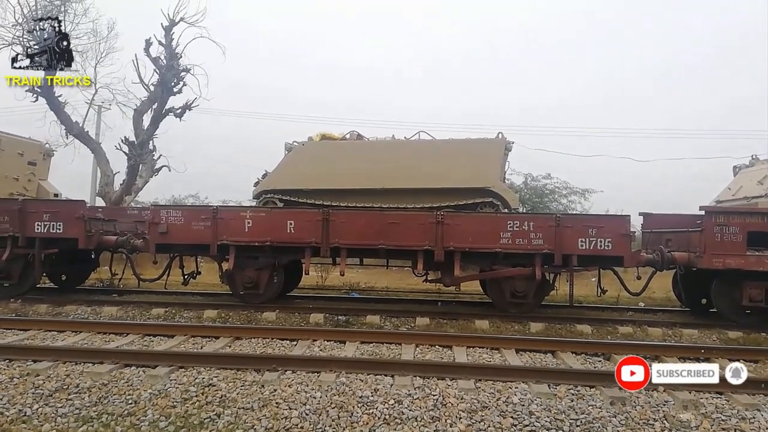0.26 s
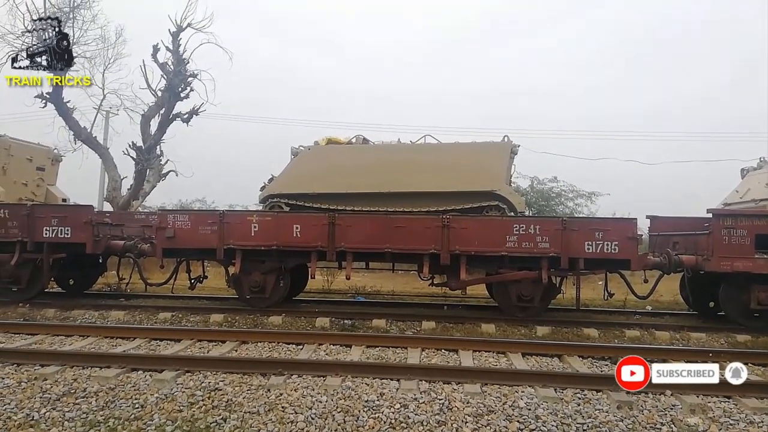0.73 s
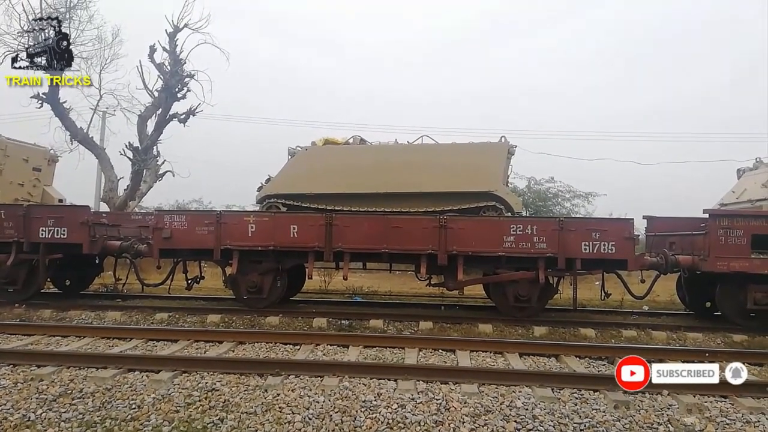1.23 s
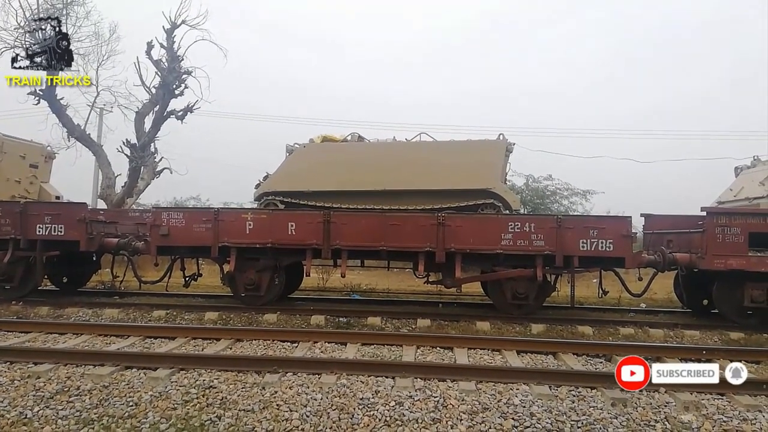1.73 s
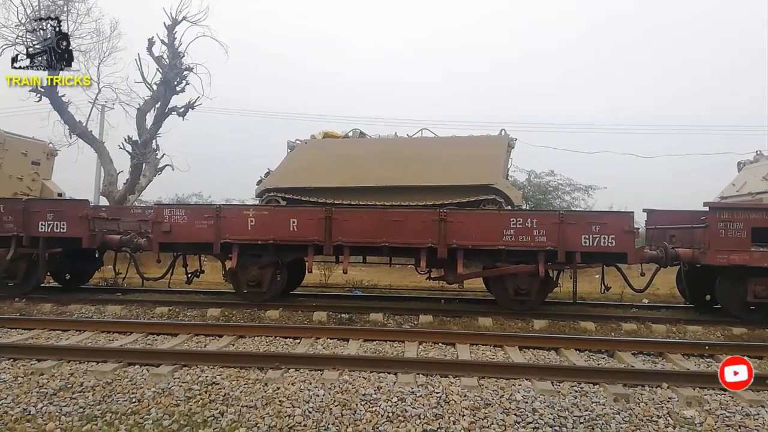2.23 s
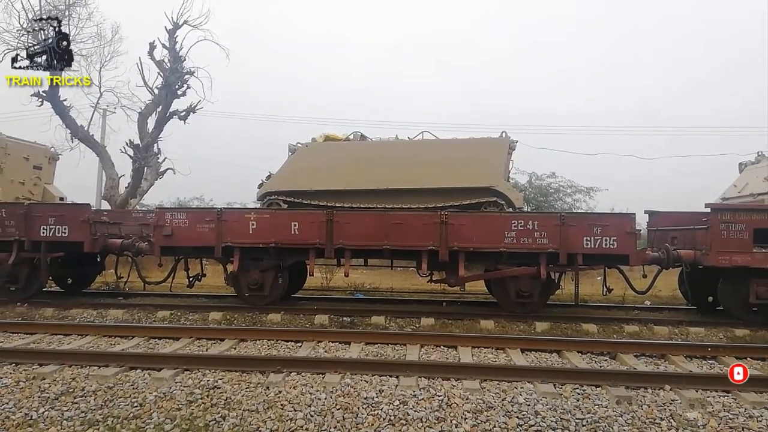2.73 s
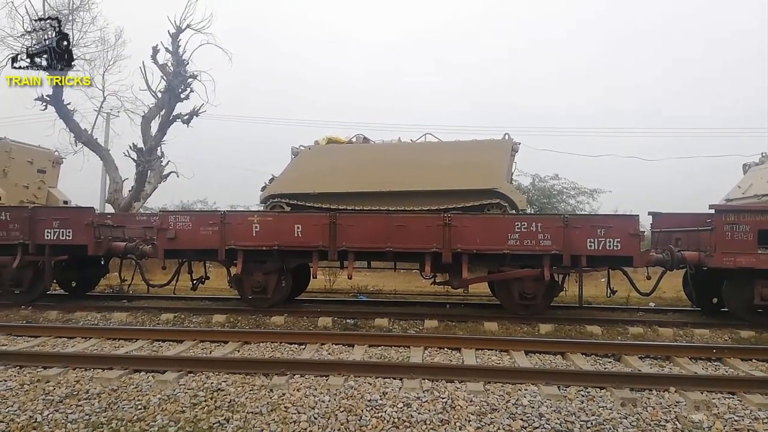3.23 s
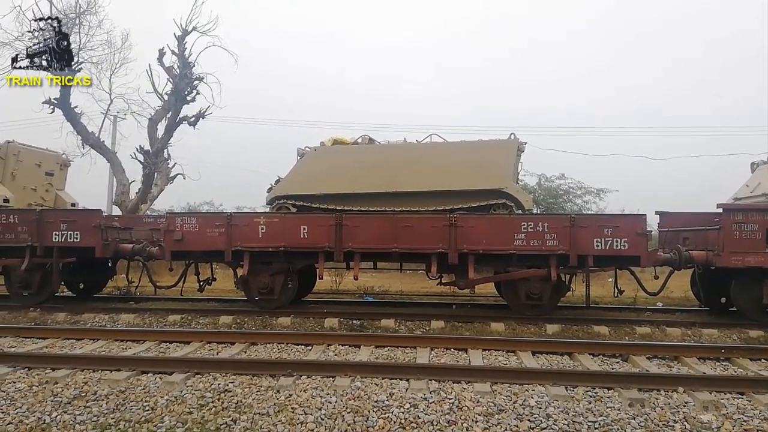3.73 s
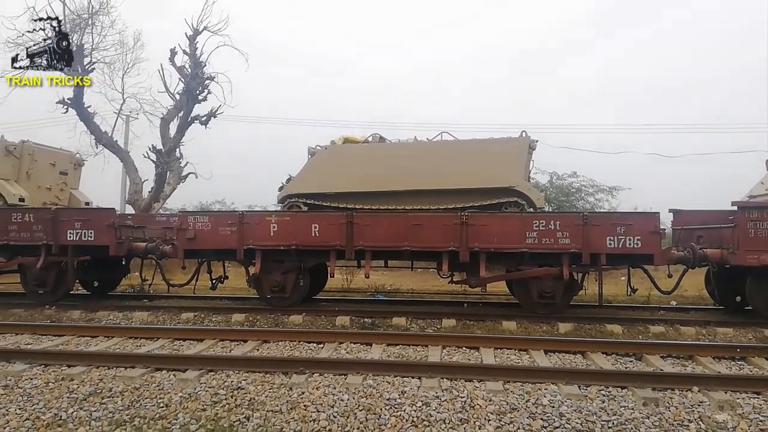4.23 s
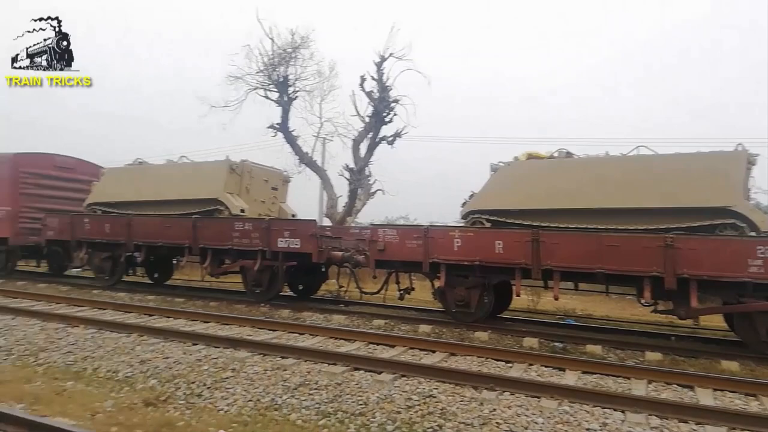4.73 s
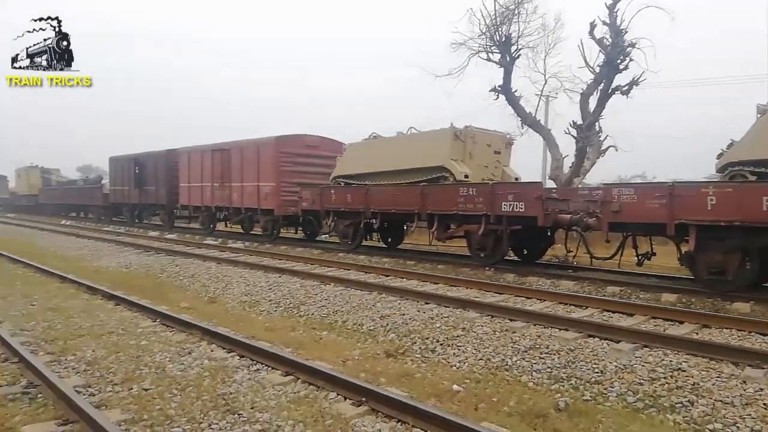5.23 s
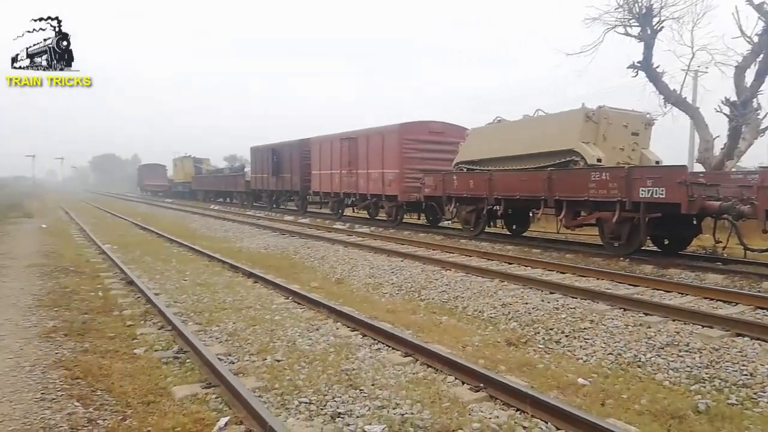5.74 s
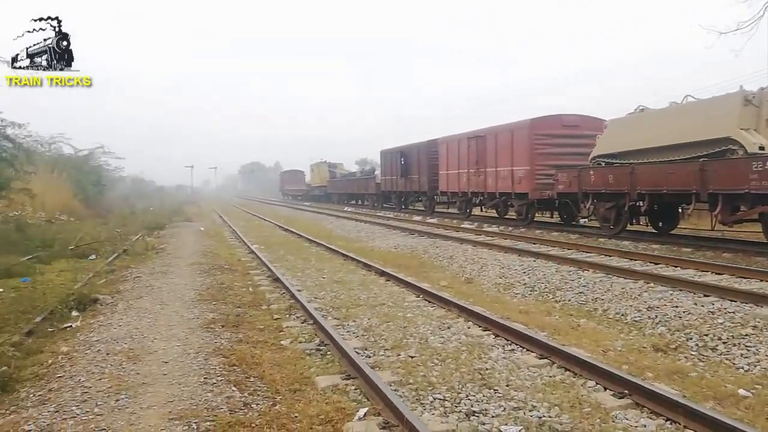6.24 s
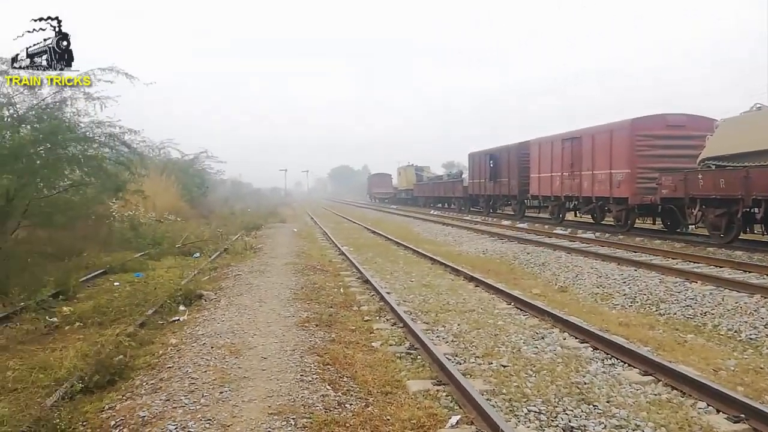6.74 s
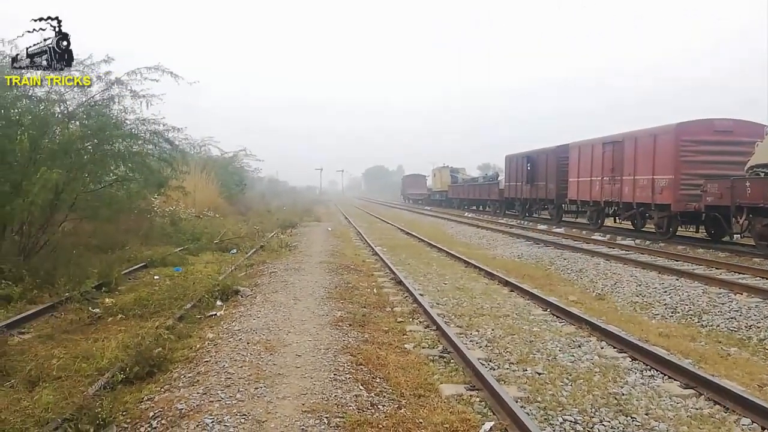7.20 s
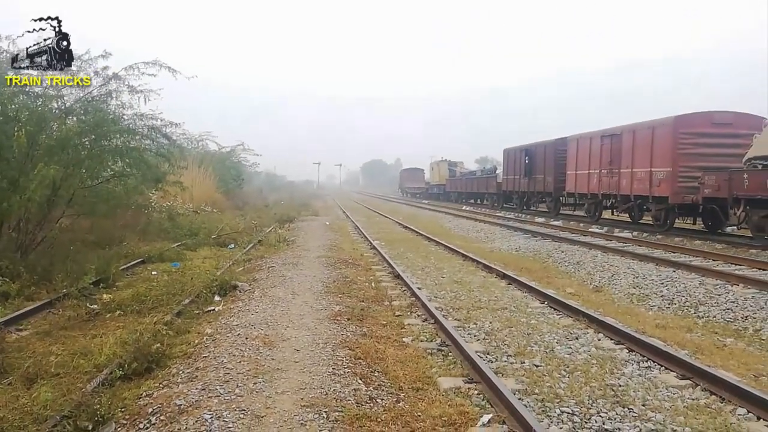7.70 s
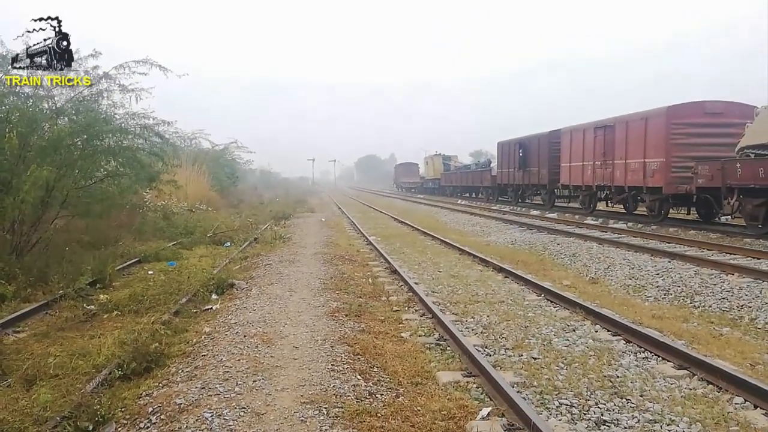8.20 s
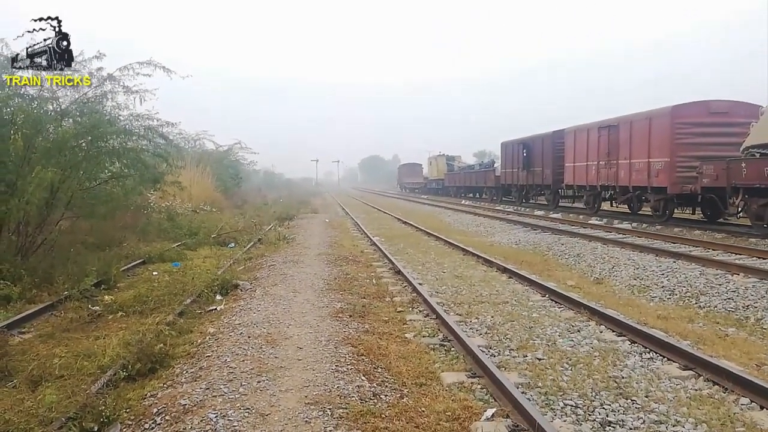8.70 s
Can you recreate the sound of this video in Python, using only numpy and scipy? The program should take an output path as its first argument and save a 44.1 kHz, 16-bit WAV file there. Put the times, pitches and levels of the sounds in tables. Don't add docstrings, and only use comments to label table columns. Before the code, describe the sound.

A large diesel idles throughout in an open rail yard: a low, uneven throb under a broad midrange rush of air, a faint steady whine and quick, soft high ticks. At 0.9 s a thin airy whistle leaks out and grows; at 1.05 s it bursts into a very loud, wide, turbulent hiss with a low pipe boom, peaking near 1.15 s, weakening and shutting at about 1.45 s. A softer echo sinks away over the next half second. The rumble is pushed down by the blast, then quickly returns. A low fan hum slowly rises in pitch until about 6 s. Faint creaks and soft knocks come at 2.1, 2.5 and 3.6 s, with light cloth brushes. From 4.4 s the handheld microphone turns away and the engine grows duller, with rubbing and the strongest knock near 4.9 s, towards the right. Two soft taps follow around 7.3 and 7.5 s; the idle continues to the end at about 9 s.

```python
import sys
import numpy as np
from scipy import signal
from scipy.fft import irfft
from scipy.io import wavfile
from scipy.ndimage import uniform_filter1d

SR = 44100
rng = np.random.default_rng(int(sys.argv[2]) if len(sys.argv) > 2 else 0)


def int16_out(signal):
    q = np.round(np.clip(np.atleast_2d(signal).T, -1, 1) * 32767)
    wavfile.write(sys.argv[1], SR, q.astype(np.int16))


def rack_gain(trim_db):
    fader = np.asarray(trim_db, float)
    return 10 ** (fader / 20)


N = 395136
FRAME, HOP = 1024, 256
HZ = np.fft.rfftfreq(FRAME, 1 / SR)[:, None]
T = (np.arange(N // HOP + 5) * HOP / SR)[None]

CYCLE_HZ, CYCLE_START_S = 1.833, .0417
RUMBLE_DB = -51
EDGE_HZ = 15200

# pitch_hz, density_db
ROAR_FACING = [(160, -40), (280, -15), (326, -13.5), (434, -7.5), (696, -9.5), (757, -4.5), (1230, -14),
               (1540, -13.5), (1980, -18), (2770, -23.5), (4300, -25), (6130, -31.5), (7010, -30),
               (14700, -52), (15800, -56)]
ROAR_HALF_TURNED = [(160, -38), (280, -8), (331, -7), (399, -14.5), (568, -8.5), (1040, -11), (1410, -22.5),
                    (1590, -15.5), (2190, -16), (2730, -28.5), (7010, -32), (14700, -57.5), (15800, -51)]
ROAR_AWAY = [(160, -47), (280, -38), (326, -31), (367, -1.5), (696, -11.5), (757, -2), (824, -10),
             (1540, -12), (2050, -18), (2970, -22.5), (5090, -28.5), (7130, -25), (8020, -32.5),
             (14700, -48), (15800, -57)]
# pitch_hz, density_db
RUMBLE = [(15, -26), (25, -17), (45, -4), (70, -22), (130, -15.5), (200, 9.5), (250, 10.5), (280, -17),
          (400, -42.5), (700, -90)]
# pitch_hz, gain_db
CAVITY = [(2500, 0.), (3000, 2.5), (3600, -0.5), (4300, 2), (5200, -2), (6000, 2.5), (8000, -3),
          (9300, 1.5), (11000, 0.5), (13000, 0), (15000, 8)]
# start_s, pitch_hz, level_db (over the roar), half_length_s
RUSTLES = [
    (3.053, 3500, 7, 0.016),
    (3.78, 1800, 6, .03),
    (3.88, 3460, 4, .03),
    (4.75, 1520, 6, 0.23),
    (5.1, 2260, 1.5, .25),
]
# pitch_hz, level_db (rms)
WHINE = [
    (748.3, -58.5),
    (812.9, -87),
    (931.3, -64.5),
    (1497, -63.5),
    (1556, -73),
]
INJECTORS_DB = [-9, -3.5, -11, -1.5, 1.5, -0.5, 0.5, 0, 2.5, -5, -5, -12]
# multiple, level_db (rms)
HARMONICS = [(11, -53.4), (12, -55.6), (13, -48.8), (16, -59.1), (17, -55.7), (18, -54.1), (19, -46.3),
             (20, -50.8), (21, -53.3), (23, -49.5), (24, -45.4), (25, -54.7), (30, -44.4), (32, -52.7),
             (34, -54.2), (35, -54.8), (39, -57.2), (40, -58.5), (41, -51.3), (42, -55.5), (43, -49.1),
             (45, -53.7), (47, -49.8), (51, -59.8), (52, -55.5), (53, -53.8), (58, -59.1), (60, -54.3),
             (62, -54.7), (64, -57.6),
             (66, -60.5), (68, -54.6), (70, -56.1), (72, -59.9), (76, -62.4), (78, -56.1), (79, -64.2),
         (80, -58.7), (82, -63.7), (84, -59.6), (86, -62.1), (88, -58.3), (96, -60.6), (97, -63.4),
         (104, -59.0), (105, -61.0), (106, -60.6), (107, -63.0), (108, -56.0), (110, -58.9), (112, -60.5),
         (122, -62.8), (124, -60.3), (128, -53.3), (132, -56.4), (150, -64.2)]
# pitch_hz, level_db (rms)
MINOR = [(14, -88), (20, -73), (30, -61), (60, -78), (120, -60), (245, -66), (280, -73.5), (335, -69.5),
         (450, -84.5), (600, -86.5)]
# start_s, pitch_hz, level_db (rms)
FAN = [
    (0, 64.3, -48),
    (2, 64.5, -46.5),
    (3.3, 66.5, -41.5),
    (4.6, 68, -46),
    (6, 69.82, -42),
    (7.4, 69.17, -42.5),
    (8.96, 69.6, -41),
]
# start_s, turn (0 facing, 1 half, 2 away)
TURN = [
    (0, 0.14),
    (4.4, .016),
    (4.9, 0.82),
    (5.5, 1.27),
    (6.2, 1.44),
    (6.8, 1.64),
    (8.96, 1.6),
]
# turn, roar_db, injector_db, whine_db
BEARING = [
    (0, -46.5, -73, 2),
    (1.25, -47.5, -78.5, -1.5),
    (1.65, -48, -68.5, 2),
]
# (pitch_hz, left_right_db)
PORTS_FACING = [
    [(150, 5), (400, 5.5), (600, 1.5), (1300, 1.16), (2300, 0.1), (4000, 0.5), (9000, -0.5)],
    [(0, -3.5), (520, -2.0), (1380, -1), (4310, -7.5), (6120, -4), (13700, -18), (14300, -14), (15500, -16)],
    [(60, 25), (120, -14), (240, 10.5), (480, -10), (950, 0), (1890, 5.5), (3770, -4), (7520, 7), (15000, 2.5)],
]
PORTS_AWAY = [
    [(150, 1), (260, 0.6), (400, 0.36), (700, 0.44), (1600, 0.93), (3500, 0.067), (6500, 0.22), (9000, 0.081)],
    [(0, 11.5), (500, -1.5), (2000, -2.5), (4000, -8.5), (15000, -17)],
    [(60, 0.0), (120, -23), (240, -3), (480, -4), (950, -0.5), (1890, 2.5), (3770, -4), (7520, 2.5), (15000, 2)],
]
PORTS_VALVE = [
    [(300, 0.92), (700, 0.42), (2300, 0.18), (4000, 0.57), (6000, 0.37), (12000, .12)],
    [(0, 3), (430, -1.7), (4480, 0.5), (7750, 2.5), (10100, 6), (13000, -6), (14500, -3.0), (15500, -11)],
    [(60, -0.5), (92, 0.5), (140, -1), (210, 0), (330, -0.5), (500, -1), (770, -9.5), (1170, 14.5), (1790, 8.5), (2740, 1.5), (4190, -2), (6410, 3.5), (9810, 14), (15000, 17.5)],
]
# start_s, peak_db, pitch_hz, left_right_db
KNOCKS = [
    (2.467, -31.5, 480, -0.5),
    (3.582, -34, 487, -5),
    (4.625, -39, 894, -1.0),
    (4.934, -25, 1026, -14.5),
    (5.273, -46, 498, -2.5),
    (7.265, -36, 950, 0),
    (7.518, -34, 1000, -0.5),
]
# start_s, peak_db, left_right_db, top_hz
CLICKS = [
    (2.119, -41, -1, 7500),
    (3.6754, -54, 1, 8000),
    (4.6354, -52, .5, 12000),
    (4.7097, -48, -.5, 9000),
    (4.9354, -51, -3, 12000),
    (5.2734, -47, 2, 6000),
    (6.4334, -52, 0, 12000),
]
# pitch_hz, width_hz, level_db
LEAK = [(1870, 140, 1.5), (4200, 160, 5.5), (3600, 600, -6), (6500, 1900, -5.5), (8700, 970, -15),
        (11000, 6200, -26)]
# pitch_hz, density_db
JET = [(290, -38), (500, -13.5), (667, -14), (782, -6.5), (1240, -11.5), (1390, -9), (2280, -3.5),
       (2630, -5.5), (4360, -3.5), (5260, -6.5), (5990, -0.5), (8300, -8.5), (9640, -13.5), (11100, -20),
       (14400, -23), (15800, -32)]
# pitch_hz, width_hz, level_db
PIPE = [
    (233, 37, 0.5),
    (350, 60, -6),
]
# pitch_hz, density_db
ECHOES = [(1000, -15), (1700, -3), (2070, -3), (2470, 0), (2700, -21), (3030, 0.5), (3970, -3.5),
          (4520, -2.5), (7200, -2.5), (8050, -11), (9350, -17), (14500, -28), (15800, -40)]

LEAK_S, LEAK_RISE_S, LEAK_DB, LEAK_GROW_DB_PER_S = 0.92, 0.04, -44.5, 46
BLAST_S, BLAST_RISE_S, RISE_POWER, BLAST_DB = 1.0525, 0.083, 1.3, -9.5
SAG_DB_PER_S, SHUT_S, SHUT_DB_PER_S = 65.5, 1.434, 170
THIN_DB, FULL_DB, FULL_S, FULL_SPAN_S, THINNING_DB_PER_S = -8.5, 0.5, 1.177, 0.075, 21
BOOM_RISE_S, BOOM_DB, BOOM_SAG_DB_PER_S, BOOM_END_S, BOOM_FADE_DB_PER_S = 0.04, -26, 31.5, 1.475, 150
ECHO_DB, ECHO_FADE_DB_PER_S, ECHO_HZ, ECHO_SINK_HZ_PER_S = -36, 73, 4150, 900


def evened(x):
    return x / np.sqrt(np.mean(x ** 2) + 1e-20)


def read(points, hz):
    f, value = np.transpose(points)
    return np.interp(np.log(hz + 1), np.log(f + 1), value)


def columns(rows, t):
    s, *rest = np.transpose(rows)
    return [np.interp(t, s, c) for c in rest]


def unit(gain):
    return gain / np.sqrt((gain ** 2).sum(0) / 1.5)


def humps(peaks):
    power = 0
    for hz, width, db in peaks:
        power = power + rack_gain(2 * db) / (1 + (2 * (HZ - hz) / width) ** 2) ** 2
    return np.sqrt(power)


def ports_at(tables):
    return [read(table, HZ) for table in tables]


def noise(gain, ports, patchy_db):
    same, lead, pan_db = ports
    a, b, c, d, patches = rng.standard_normal(gain.T.shape + (5,)).T
    patches = uniform_filter1d(patches, size=12, axis=0)
    patches = evened(uniform_filter1d(patches, size=12, axis=1))
    same = np.clip(same, 0, 1)
    right = a + 1j * b
    left = same * right * np.exp(1j * lead) + np.sqrt(1 - same ** 2) * (c + 1j * d)
    panned = np.array([left * rack_gain(pan_db / 2), right * rack_gain(-pan_db / 2)])
    z = panned * gain * rack_gain(patchy_db * patches)
    return signal.istft(z, nperseg=FRAME, noverlap=FRAME - HOP)[1][:, :N]


def shares(stage):
    return [np.maximum(1 - abs(np.clip(stage, 0, 2) - k), 0) for k in range(3)]


def bearing(t):
    return columns(BEARING, columns(TURN, t)[0])


def opening(t, start_s, rise_s, db, slope_db_per_s, end_s, fade_db_per_s, power=1):
    drift_db = slope_db_per_s * np.maximum(t - start_s - rise_s, 0)
    drift_db = drift_db - fade_db_per_s * np.maximum(t - end_s, 0)
    return np.clip((t - start_s) / rise_s, 0, 1) ** power * rack_gain(db + drift_db)


def roar():
    turn, roar_db = columns(TURN, T)[0], bearing(T)[0]
    spectra = ROAR_FACING, ROAR_HALF_TURNED, ROAR_AWAY
    colour_db = sum(w * read(s, HZ) for w, s in zip(shares(turn), spectra))
    crank = 2 * np.pi * CYCLE_HZ * (T - CYCLE_START_S)
    breath_db = .8 * np.cos(4 * crank) * (abs(HZ - 4000) < 1500)
    breath_db += 0.42 * np.cos(2 * crank - 1.5) * (HZ > 9000)
    for s, hz, db, half_s in RUSTLES:
        breath_db += db * np.exp(-((T - s) / half_s) ** 2 - (np.log((HZ + 1) / hz) / 0.16) ** 2)
    away = np.clip(turn / 2, 0, 1)
    ports = [(1 - away) * a + away * b for a, b in zip(ports_at(PORTS_FACING), ports_at(PORTS_AWAY))]
    low = rack_gain(RUMBLE_DB) * unit(rack_gain(read(RUMBLE, HZ)))
    wide = rack_gain(roar_db + breath_db + read(CAVITY, HZ)) * unit(rack_gain(colour_db)) * (HZ < EDGE_HZ)
    return noise(np.hypot(wide, low), ports, patchy_db=0.9 + 0.68 * (HZ > 9000))


def whine():
    t, out = np.arange(N) / SR, np.zeros((2, N))
    shadow = np.clip(columns(TURN, t)[0] - .9, 0, 1)
    for hz, db in WHINE:
        wander = evened(uniform_filter1d(rng.standard_normal((3, T.size)), size=8))
        pitch = np.interp(t, T[0], wander[0])
        level = np.array([np.interp(t, T[0], w) for w in rack_gain(db + 3.33 * wander[1:])])
        turns = np.cumsum(hz * (1 + .0016 * pitch)) / SR
        shade = rack_gain(-2.5 * hz / 1000 * shadow)
        out += 1.84 * shade * level * np.sin(2 * np.pi * (turns + rng.random((2, 1))))
    return rack_gain(bearing(t)[2]) * out


def injectors(hz=7050, width=450):
    t = np.arange(N) / SR
    firing = (t - CYCLE_START_S) * CYCLE_HZ * 12
    cylinder = np.floor(firing).astype(int)
    size_db = np.take(INJECTORS_DB, cylinder % 12) + 1.7 * rng.standard_normal(300)[cylinder + 12]
    puffs = rack_gain(size_db + bearing(t)[1]) * np.exp(-(firing % 1) / 0.53)
    air = rng.standard_normal((2, N))
    band = signal.butter(2, [hz - width / 2, hz + width / 2], "bandpass", fs=SR, output="sos")
    ring = signal.sosfilt(band, air + 0.37 * air[::-1])
    return uniform_filter1d(puffs, size=220) * 2.57 * evened(ring)


def engine():
    k, points = np.arange(400), 2 ** 16
    level_db = read(MINOR, k * CYCLE_HZ) + 2.5 * rng.standard_normal(400)
    level_db += 2.1 * (-1) ** k * (k > 60)
    for multiple, db in HARMONICS:
        level_db[int(multiple)] = db
    harmonics = rack_gain(level_db) * np.exp(2j * np.pi * rng.random(400))
    cycle = irfft(harmonics, points) * points / np.sqrt(2)
    t = np.arange(N) / SR
    hz, fan_db = columns(FAN, t)
    fan = np.sqrt(2) * rack_gain(fan_db) * np.sin(2 * np.pi * np.cumsum(hz) / SR)

    def heard(lag_s):
        return np.interp((t - lag_s) * CYCLE_HZ % 1, np.arange(points) / points, cycle, period=1)

    return np.array([heard(0.00029), heard(0)]) + fan


def knocks(cycles=0.64, late_s=0.0015):
    out = np.zeros((2, N))
    for s, db, hz, pan_db in KNOCKS:
        u = np.arange(300) * hz / SR
        swing = 0.36 * np.tanh(u ** 2) - np.sin(2 * np.pi * u)
        wavelet = swing * u / cycles * np.exp(1 - u / cycles)
        sides_db = np.array([[pan_db], [-pan_db]]) / 2
        out[:, round((s + late_s) * SR):][:, :300] += rack_gain(db - 2.5 + sides_db) * wavelet
    return out


def clicks(length_s=0.0013):
    out, u = np.zeros((2, N)), np.arange(300) / SR / length_s
    for s, db, pan_db, top_hz in CLICKS:
        low_pass = signal.butter(4, min(top_hz, SR / 3), fs=SR, output="sos")
        crackle = signal.sosfilt(low_pass, rng.standard_normal((2, 300))) * 0.49
        sides_db = np.array([[pan_db], [-pan_db]]) / 2
        out[:, round(s * SR):][:, :300] += rack_gain(db + 4.0 + sides_db) * crackle * u * np.exp(1 - u)
    return out


def valve():
    start = round(.9 * SR)
    t = (start + np.arange(200)[None] * HOP) / SR
    leak = unit(humps(LEAK)) * opening(t, LEAK_S, LEAK_RISE_S, LEAK_DB, LEAK_GROW_DB_PER_S,
                                       BLAST_S, 150, power=1.6)
    full_db = THIN_DB * np.clip((FULL_S - t) / (FULL_S - BLAST_S), 0, 1)
    full_db += FULL_DB * np.exp(-((t - FULL_S) / FULL_SPAN_S) ** 2)
    full_db -= THINNING_DB_PER_S * np.maximum(t - FULL_S, 0)
    jet = unit(rack_gain(read(JET, HZ))) * rack_gain(full_db / (1 + (HZ / 2200) ** 4))
    jet = jet * np.hypot(1, humps([(4400, 710, 3.9), (9530, 690, 3.9)]))
    jet = jet * opening(t, BLAST_S, BLAST_RISE_S, BLAST_DB, -SAG_DB_PER_S, SHUT_S, SHUT_DB_PER_S, RISE_POWER)
    boom = unit(humps(PIPE)) * opening(t, BLAST_S, BOOM_RISE_S, BOOM_DB, -BOOM_SAG_DB_PER_S,
                                       BOOM_END_S, BOOM_FADE_DB_PER_S)
    sinking_hz = ECHO_HZ - ECHO_SINK_HZ_PER_S * (t - SHUT_S)
    ringing = np.hypot(1, humps([(sinking_hz, 200, 10), (9400, 700, 4)]))
    echoes = unit(rack_gain(read(ECHOES, HZ)) * ringing)
    echoes = echoes * opening(t, BLAST_S, SHUT_S - BLAST_S, ECHO_DB, 0, SHUT_S, ECHO_FADE_DB_PER_S)
    gain = np.sqrt(leak ** 2 + jet ** 2 + boom ** 2 + echoes ** 2)
    air = noise(gain, ports_at(PORTS_VALVE), patchy_db=1.5)
    return np.pad(air, ((0, 0), (start, N - start - air.shape[1])))


def scene():
    return roar() + whine() + injectors() + engine() + knocks() + clicks() + valve()


def top_cut(x):
    return signal.sosfilt(signal.butter(12, 15860, fs=SR, output="sos"), x)


def record(dry):
    power = abs(uniform_filter1d((dry ** 2).mean(0), size=1500))
    power_db = 10 * np.log10(power + 1e-12)
    fall_db = np.arange(N) * 48.0 / SR
    held_db = np.maximum.accumulate(power_db + fall_db) - fall_db
    over_db = np.maximum(held_db + 29.5, 0)
    mix = dry / rack_gain(0.44 * uniform_filter1d(over_db, size=400))
    return top_cut(mix)


dry = scene()
out = record(dry)
int16_out(out)
```